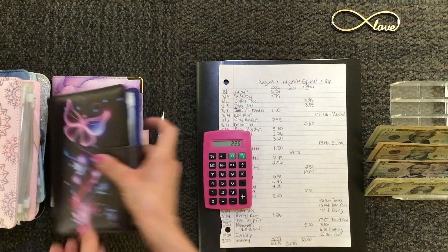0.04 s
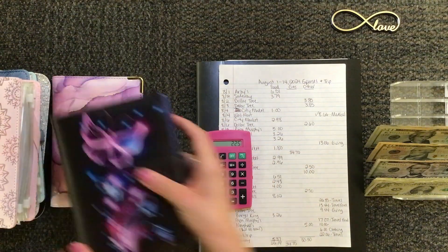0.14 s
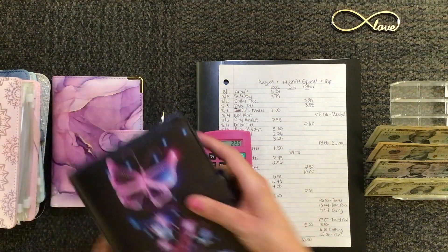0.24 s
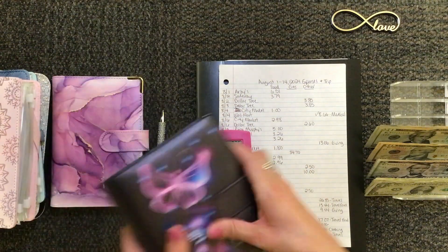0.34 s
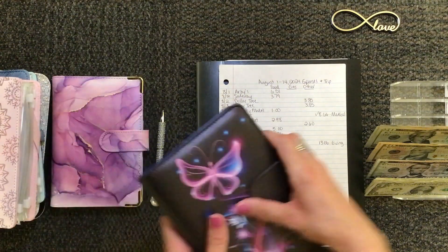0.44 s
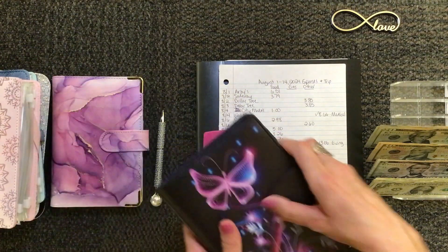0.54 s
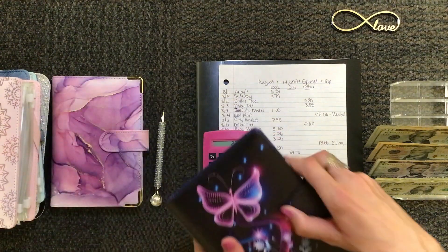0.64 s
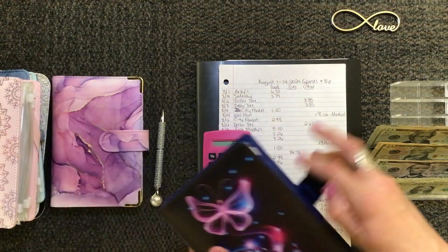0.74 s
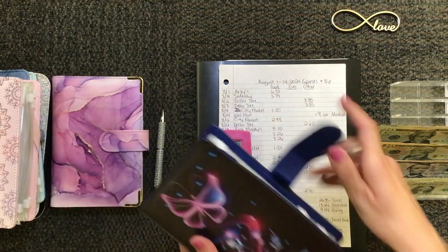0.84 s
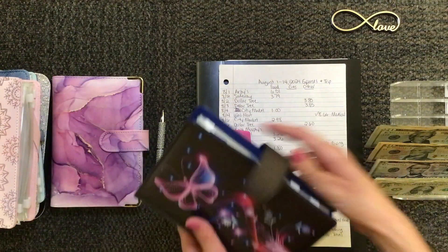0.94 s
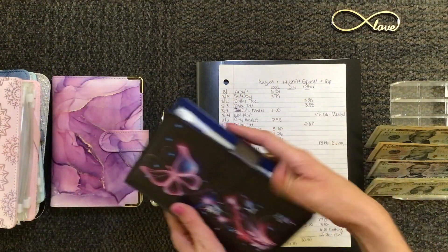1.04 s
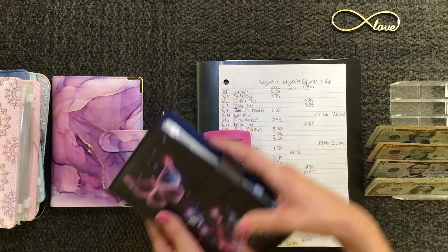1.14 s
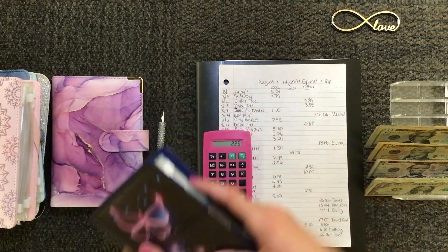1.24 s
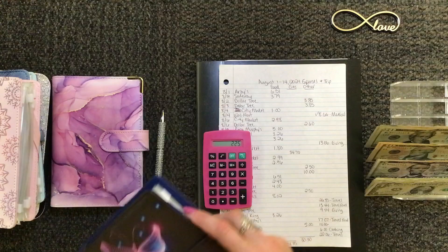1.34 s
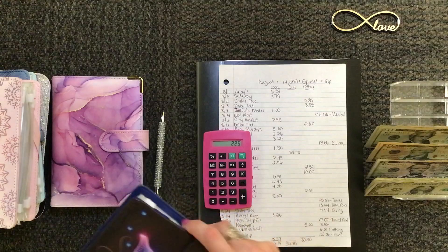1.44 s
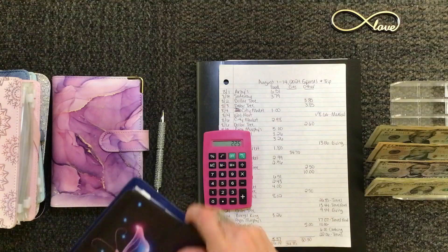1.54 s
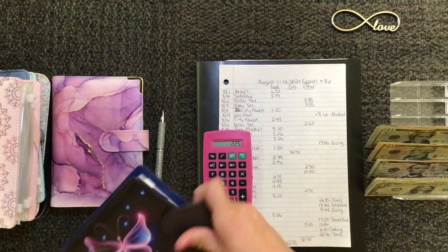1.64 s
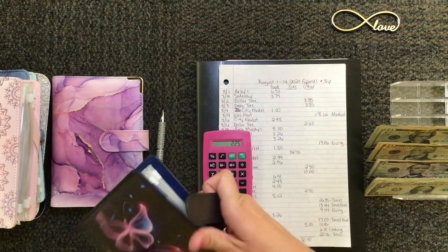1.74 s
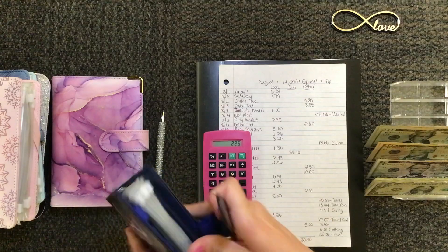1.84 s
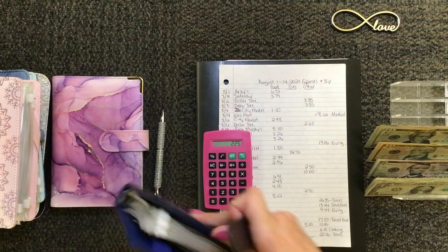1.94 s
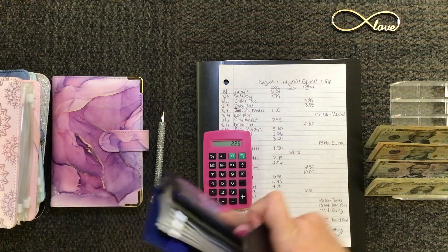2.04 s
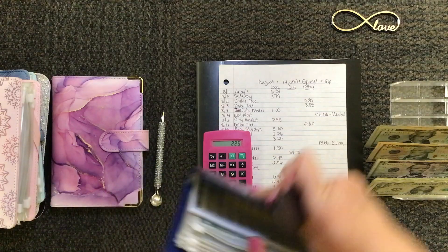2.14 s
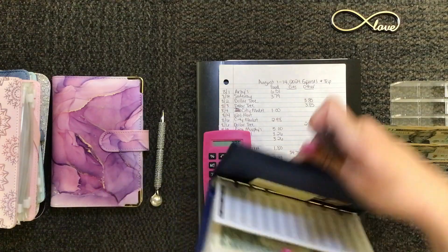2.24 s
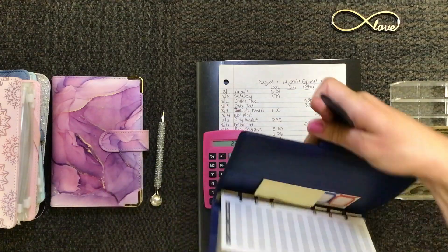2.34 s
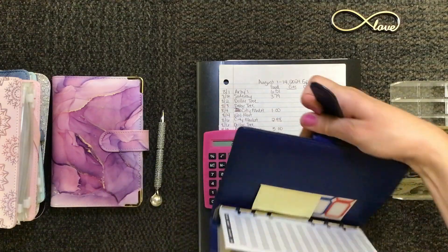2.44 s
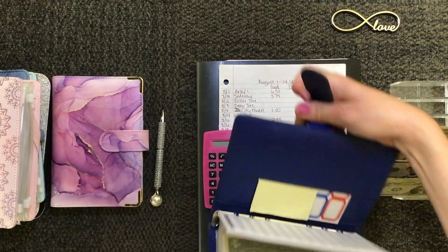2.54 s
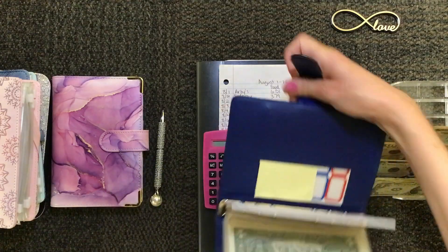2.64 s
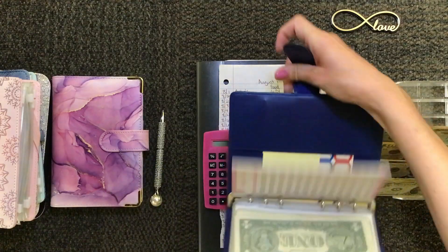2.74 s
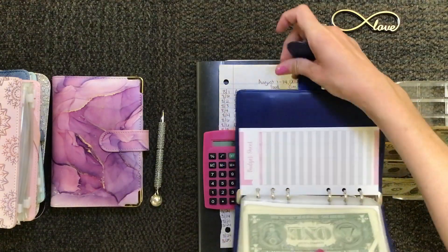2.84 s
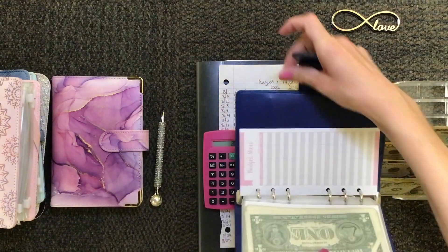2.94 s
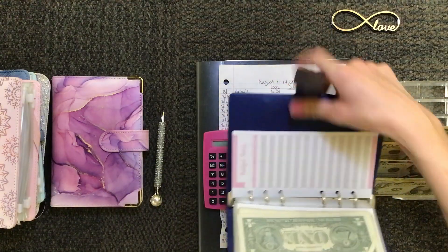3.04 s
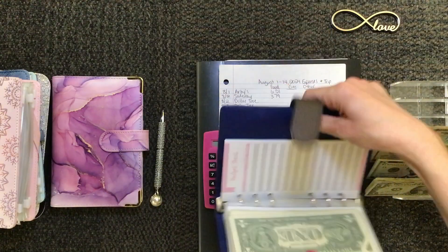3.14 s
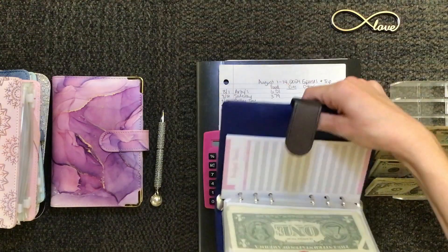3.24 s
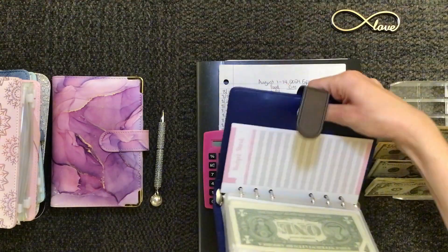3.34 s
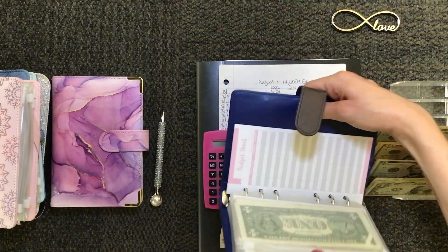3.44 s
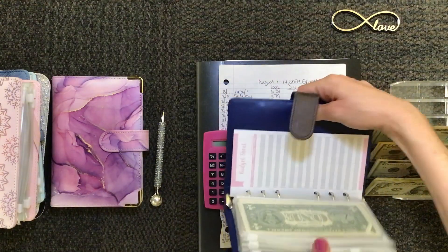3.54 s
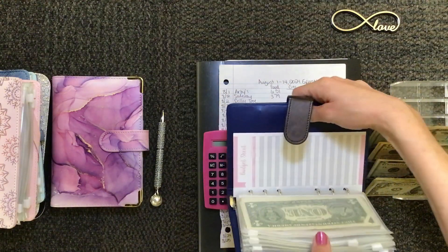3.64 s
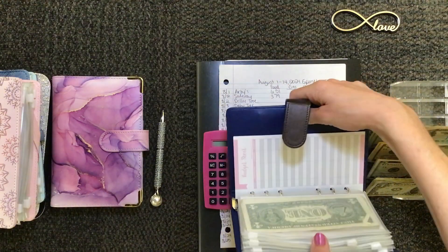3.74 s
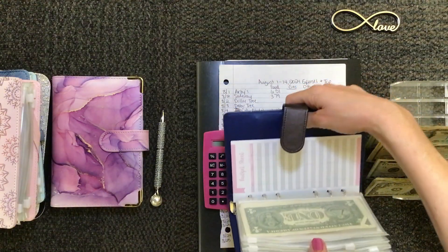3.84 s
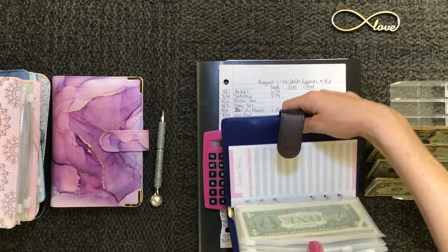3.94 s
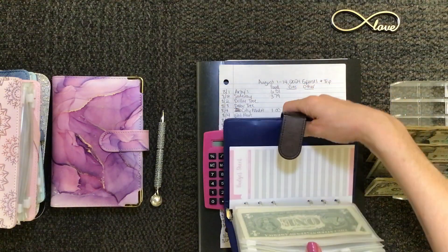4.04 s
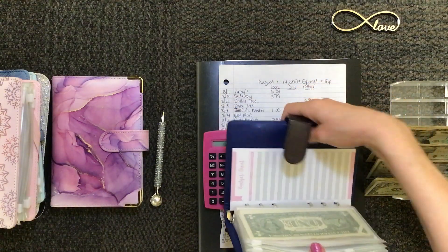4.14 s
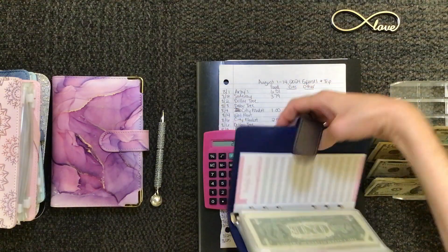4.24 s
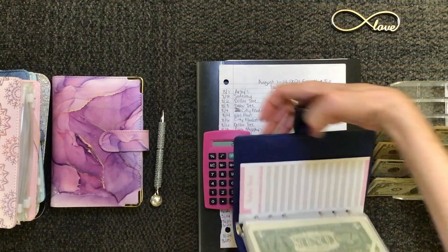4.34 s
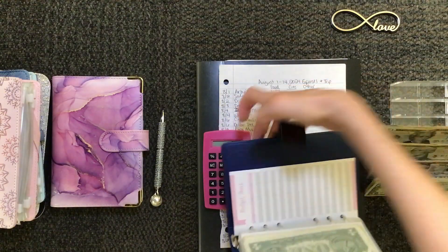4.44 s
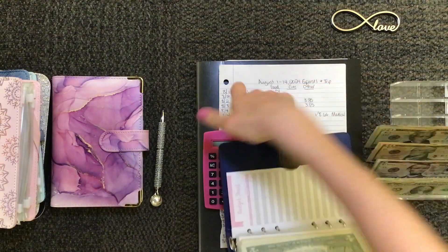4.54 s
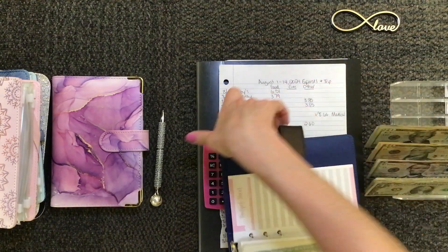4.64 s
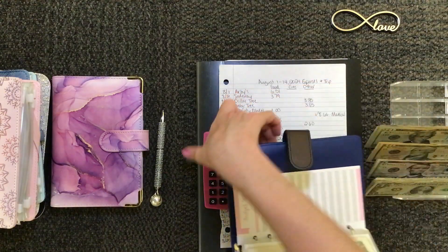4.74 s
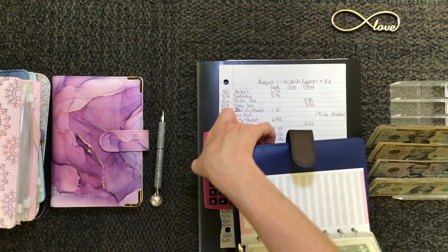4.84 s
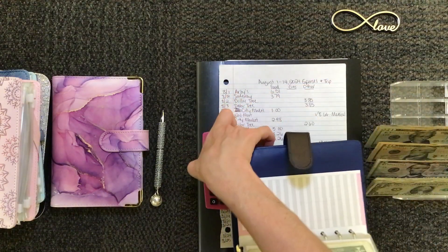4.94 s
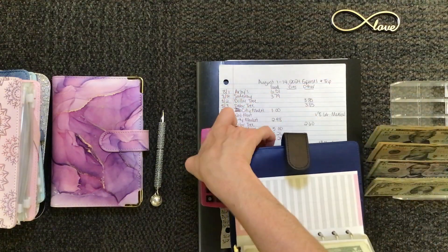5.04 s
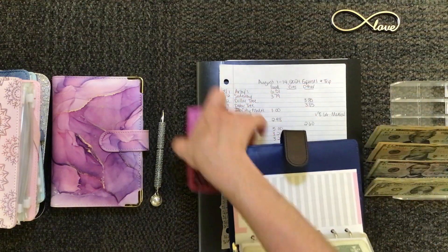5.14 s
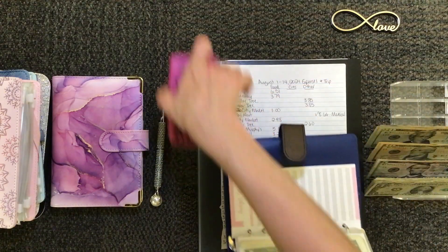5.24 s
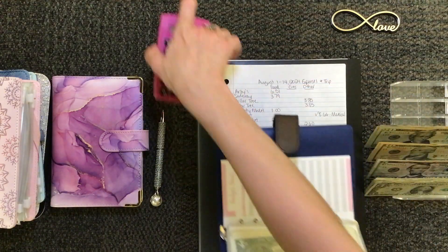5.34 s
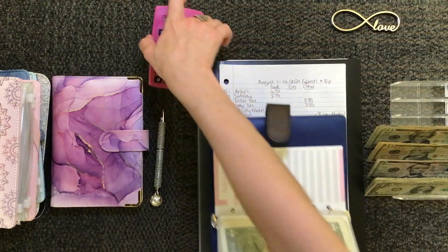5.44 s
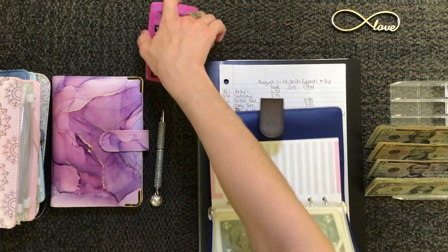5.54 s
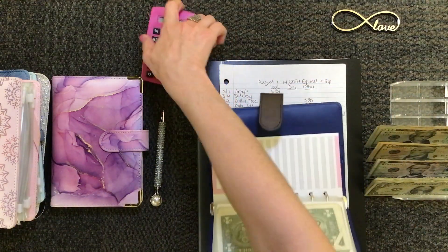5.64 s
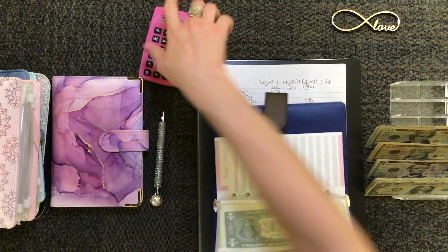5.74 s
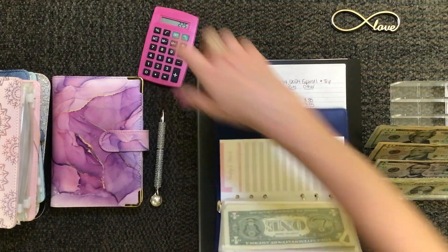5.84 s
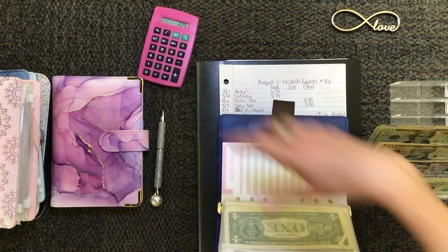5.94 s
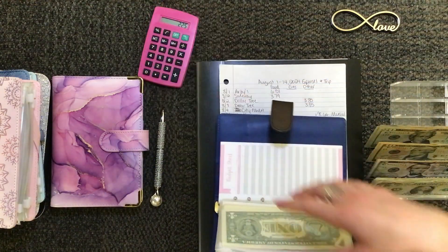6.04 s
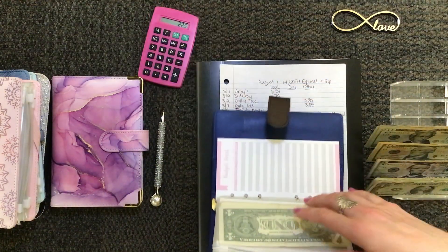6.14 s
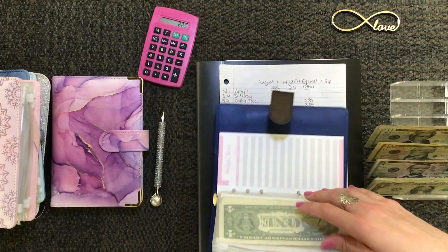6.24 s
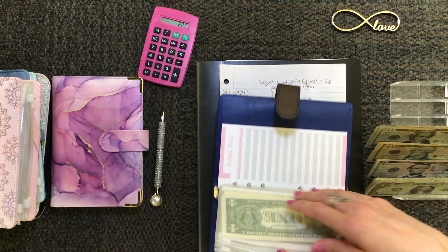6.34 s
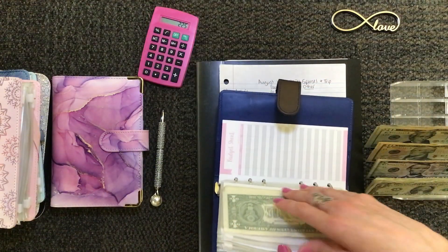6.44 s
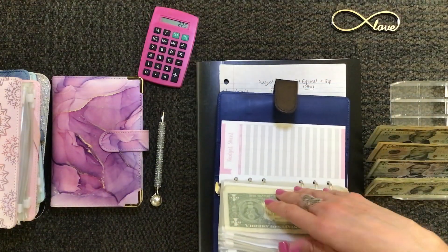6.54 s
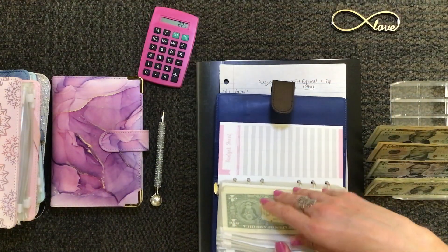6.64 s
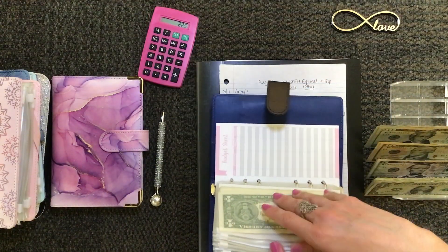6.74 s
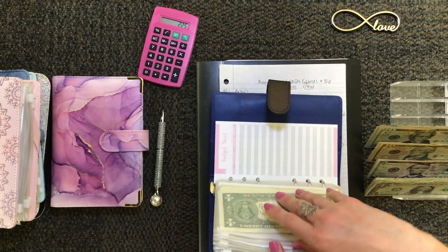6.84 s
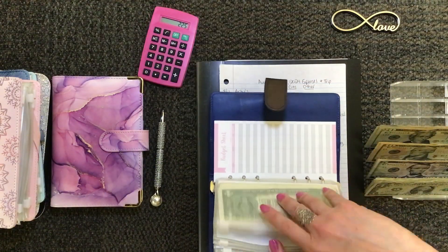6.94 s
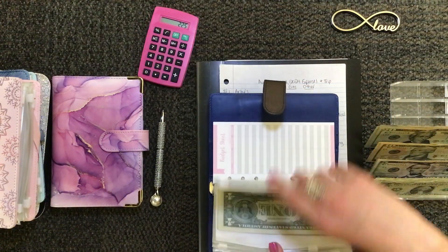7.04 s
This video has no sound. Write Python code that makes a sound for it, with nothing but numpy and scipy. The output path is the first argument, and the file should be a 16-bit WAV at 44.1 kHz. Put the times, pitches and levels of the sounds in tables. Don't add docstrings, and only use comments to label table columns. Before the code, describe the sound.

A binder is handled on a table: bent plastic snaps, skin hisses over the cover, soft bumps thud underneath. Two very loud popping strap closures stand out, about two seconds apart. Then come scattered dull page ticks, a hard hollow rattle of a calculator set down, and sparse crinkles. Close, dry microphone, short room echo, faint air noise.

```python
import sys
import numpy as np
from scipy import signal
from scipy.fft import rfft, irfft
from scipy.io import wavfile

SR = 44100
rng = np.random.default_rng(int(sys.argv[2]) if len(sys.argv) > 2 else 0)


def inscribe(sig):
    pcm = np.round(np.clip(np.atleast_2d(sig).T, -1, 1) * 32767)
    wavfile.write(sys.argv[1], SR, pcm.astype(np.int16))


def ratio_of_db(decibels):
    return 10 ** (np.asarray(decibels, float) / 20)


N = 312669


def rms_one(x):
    return x / np.sqrt(np.mean(x ** 2) + 1e-20)


def in_time(rows):
    s, *columns = np.transpose(rows)
    return [np.interp(np.arange(N) / SR, s, column) for column in columns]


def at_hz(points, hz, axis=1):
    points = np.array(points)
    return np.interp(np.log(hz), np.log(points[:, 0]), points[:, axis])


def drift(rate):
    pole = np.exp(-80 * np.pi * rate / SR)
    noise = rng.standard_normal(N // 40 + 2002)
    slow = signal.lfilter([1], [1, -2 * pole, pole * pole], noise)[2000:]
    return np.interp(np.arange(N) / 40, np.arange(len(slow)), rms_one(slow))


def colour(x, spectrum):
    hz = np.fft.rfftfreq(len(x), 1 / SR) + 1
    return rms_one(irfft(rfft(x) * ratio_of_db(at_hz(spectrum, hz)), len(x)))


def band_filter(x, edges):
    return signal.sosfilt(signal.butter(2, edges, "band", fs=SR, output="sos"), x)


def high_filter(x, hz, order=2):
    return signal.sosfilt(signal.butter(order, hz, "high", fs=SR, output="sos"), x)


def resonance(x, hz, width_hz):
    r = np.exp(-np.pi * width_hz / SR)
    return rms_one(signal.lfilter([1, 0, -1], [1, -2 * r * np.cos(2 * np.pi * hz / SR), r * r], x))


def grains(per_s, spread_db):
    sizes_db = spread_db * np.minimum(rng.exponential(1, N), 5)
    sizes = ratio_of_db(sizes_db) * rng.standard_normal(N)
    return sizes * (rng.random(N) < per_s / SR)


def add(track, s, sound):
    i = round(s * SR)
    track[i:i + len(sound)] += sound[:N - i]


def swell(s, rise_s, fall_s, db, held_s=0):
    t, power = np.arange(0, N + 32, 32) / SR, 1e-20
    for at, rise, fall, top, held in np.broadcast(s, rise_s, fall_s, db, held_s):
        distance = np.maximum((at - t) / rise, np.maximum(t - at - held, 0) / fall)
        power = power + ratio_of_db(2 * top - 40 * distance)
    return np.interp(np.arange(N) / SR, t, np.sqrt(power))


def hands():
    # t/s, rumble level/dB
    grip_curve = [(0.0, -50.5), (0.33, -61), (0.47, -55), (0.51, -45.5), (0.85, -48), (1.48, -53.5),
                  (2.67, -51), (3.04, -49), (3.49, -56.5), (3.91, -53), (5.05, -58), (5.63, -56.5),
                  (5.81, -68), (5.96, -56.5), (7.09, -56)]
    # peak t/s, 20 dB
    # rise/s, 20 dB fall/s, level/dB
    wisp_events = [(.33, .04, .04, -50), (.37, .05, .06, -49), (.45, .03, .04, -53), (.578, .02, .03, -50),
                   (.72, .08, .06, -55), (.798, .03, .03, -51), (.822, .04, .04, -46),
                   (.848, .03, .04, -52), (.897, .025, .025, -53), (1.058, .03, .04, -56),
                   (1.22, .06, .08, -62), (1.339, .006, .015, -39), (1.353, .006, .015, -41),
                   (1.81, .08, .08, -44), (1.88, .05, .05, -47), (2.26, .015, .02, -54),
                   (4.695, .005, .015, -56)]
    # f/Hz, density/dB per Hz
    slide_spectrum = [(600, -32), (1200, -13.5), (2000, 2), (3200, 0.5), (5300, 2), (6700, -1.5),
                      (9000, 1.5), (12000, -1), (16000, -0.5)]
    # f/Hz, density/dB per Hz
    sheen_spectrum = [(5000, -30), (8000, -8), (10000, -2), (13500, 2), (15500, -3), (17000, -8)]
    # f/Hz, density/dB per Hz
    rumble_spectrum = [(90, -56), (200, 3), (320, 1), (600, -3), (1000, -4.5), (2000, -32.5)]

    grip_db = in_time(grip_curve)[0]
    creep_db = .3 * (grip_db - grip_db.mean())
    clump, slips = drift(35), grains(9000, spread_db=1.5)
    slide = ratio_of_db(1.5 + .9 * clump + 0.43 * drift(65)) * colour(slips, slide_spectrum)
    sheen = ratio_of_db(1.5 * clump) * swell(*np.transpose(wisp_events)) * colour(slips, sheen_spectrum)
    rustle = ratio_of_db(-3.0 + 0.84 * clump + 0.5 * drift(38)) * sleeve_rustle()
    rumble = ratio_of_db(grip_db - 2.5 + 1.8 * drift(14)) * colour(rng.standard_normal(N), rumble_spectrum)
    hiss_gain = effort(axis=-2, creep_db=-69 + creep_db)
    rustle_gain = effort(axis=-1, creep_db=-62.5 + creep_db)
    return hiss_gain * slide + rustle_gain * rustle + rumble + sheen


def effort(axis, creep_db):
    # peak t/s, 20 dB rise/s, 20 dB fall/s, hiss level/dB, rustle level/dB
    sweeps = [(.018, .03, .1, -51, -45), (.7, .2, .1, -58, -46), (.83, .06, .07, -52, -56),
              (.895, .03, .04, -60, -56), (1.07, .1, .2, -60, -43), (1.31, .15, .06, -44, -44),
              (1.558, .045, .05, -41, -39.5), (1.72, .12, .1, -46, -45), (1.81, .16, .2, -36, -41),
              (1.96, .1, .12, -51, -48), (2.01, .1, .06, -53, -46), (2.574, .15, .12, -50, -52),
              (2.696, .1, .07, -49, -52), (3.15, .1, .3, -57, -56), (3.646, .1, .08, -59, -59),
              (4.05, .1, .13, -63, -46), (4.25, .15, .12, -52, -47), (4.39, .1, .06, -53, -56),
              (5.03, .1, .15, -60, -66), (5.42, .3, .3, -64, -66), (6.21, .11, .015, -50, -49),
              (6.33, .06, .09, -44, -54), (7.09, .4, .1, -60, -53)]
    # t/s, 20 dB fall/s, hiss level/dB, rustle level/dB
    flicks = [(.162, .03, -54, -49), (.578, .04, -39, -38), (1.345, .11, -41, -42), (2.292, .05, -52, -42),
              (2.354, .07, -50.5, -52), (2.43, .07, -62, -50), (3.222, .02, -45, -56),
              (3.476, .07, -59.5, -62), (4.692, .03, -50, -60), (4.874, .15, -59, -62),
              (5.79, .25, -54, -47), (5.928, .03, -55, -52), (6.176, .12, -56, -38), (6.48, .03, -52, -60),
              (6.606, .05, -49, -41), (6.696, .035, -45, -50), (6.67, .06, -60, -50),
              (6.786, .05, -62, -58)]
    # start t/s, held/s, hiss level/dB, rustle level/dB
    drags = [(.17, .11, -75, -55), (.293, .045, -41, -38), (.36, .03, -43, -39), (.43, .14, -56, -43),
             (.62, .36, -66, -49), (1.005, .017, -48, -39), (1.16, .55, -68, -48), (2.12, .18, -52, -45),
             (2.503, .2, -59, -48), (2.7, .14, -64, -51), (3.07, .17, -64, -54), (3.6, .45, -80, -60),
             (4.162, .25, -54, -54), (4.162, .06, -62, -52), (6.24, .11, -50, -50), (6.38, .1, -61, -64)]

    sweeps, flicks, drags = np.transpose(sweeps), np.transpose(flicks), np.transpose(drags)
    sweeping = swell(*sweeps[:3], sweeps[axis])
    flicking = swell(flicks[0], .009, flicks[1], flicks[axis])
    dragging = swell(drags[0], .012, .06, drags[axis], held_s=drags[1])
    return np.sqrt(np.sum(np.square([sweeping, flicking, dragging, ratio_of_db(creep_db)]), axis=0))


def sleeve_rustle():
    # f/Hz, width/Hz
    sleeve_modes = [(1500, 1100), (2200, 1200), (3200, 1500), (4800, 2700)]
    # f/Hz, density/dB per Hz
    rustle_spectrum = [(300, -26), (800, -8), (1400, 1.5), (2200, 3), (3200, -3), (5000, -6.5),
                       (6500, -41.5), (9000, -89)]

    slips = grains(5000, spread_db=2.0)
    bent = sum(ratio_of_db(4.0 * drift(6)) * resonance(slips, hz, width_hz) for hz, width_hz in sleeve_modes)
    return rms_one(.9 * rms_one(bent) + colour(slips, rustle_spectrum))


def scrapes():
    # start t/s, length/s, from f/Hz, to f/Hz, level/dB
    scrape_events = [(.44, .05, 2000, 2100, -48), (.48, .17, 2000, 1600, -48), (.66, .08, 4000, 8000, -56),
                     (4.165, .13, 3200, 6000, -56), (4.165, .05, 1600, 2000, -52),
                     (4.3, .13, 2200, 2700, -57), (4.33, .1, 900, 1000, -59), (4.88, .04, 1100, 1200, -55),
                     (4.592, .035, 1220, 1180, -55), (5.385, .04, 1350, 1300, -54),
                     (6.66, .05, 1200, 1900, -51), (1.72, .1, 2300, 2600, -44),
                     (1.76, .15, 5200, 4900, -46), (1.34, .05, 4900, 4800, -46),
                     (1.53, .06, 2500, 2300, -46), (2.795, .05, 2100, 2000, -49),
                     (1.08, .16, 300, 270, -43), (1.03, .15, 115, 110, -49), (1.21, .12, 2500, 2600, -48),
                     (.54, .18, 850, 950, -50), (2.93, .1, 500, 450, -46), (3.17, .08, 520, 500, -52),
                     (.3, .1, 115, 110, -52)]

    out = np.zeros(N)
    noises = rng.standard_normal((len(scrape_events), 2, 8192))
    for (s, length, from_hz, to_hz, db), noise in zip(scrape_events, noises):
        part = np.linspace(0, 1, min(int(length * SR), 8192))
        hz = from_hz * (to_hz / from_hz) ** part
        low_pass = signal.butter(2, .16 * hz.mean(), fs=SR, output="sos")
        rough = signal.sosfilt(low_pass, noise)[:, -len(part):]
        glide = np.exp(2j * np.pi * np.cumsum(hz) / SR)
        band = np.real((rough[0] + 1j * rough[1]) * glide)
        add(out, s, ratio_of_db(db) * np.sqrt(np.sin(np.pi * part) + 1e-9) * rms_one(band))
    return out


def ticks(events, ring_ms, overtones, grit_share, trim_db, ratios=(.72, 1.5, 2.2)):
    out, t = np.zeros(N), np.arange(2048) / SR
    age = t / ring_ms * 1000
    for (s, db, hz, crack_db), noise in zip(events, rng.standard_normal((len(events), 2048))):
        body = np.sin(2 * np.pi * hz * t) * ratio_of_db(-60 * age)
        for k, ratio in enumerate(ratios):
            overtone_hz = hz * ratio * (1 + .08 * noise[k])
            body = body + overtones * np.sin(2 * np.pi * overtone_hz * t) * ratio_of_db(-90 * age)
        edges = np.clip([hz * .6, hz * 1.1 * ratios[-1]], 100, 15000)
        grit = band_filter(noise, edges) * ratio_of_db(-25 * age)
        click = (1 - np.exp(-t / 2e-4)) * (body + grit_share * grit)
        crack = ratio_of_db(crack_db + 8) * high_filter(noise, 5000) * np.exp(-t / 0.0009)
        add(out, s, ratio_of_db(db + trim_db) * (click / np.abs(click).max() + crack))
    return out


def creases():
    # t/s, peak level/dB, ring f/Hz
    crease_events = [(0.16, -42, 1860), (0.3197, -22, 1880), (0.4743, -32, 1840), (0.5766, -29, 2110),
                     (1.1524, -34, 2000), (1.3379, -29, 2900), (1.35, -33, 2900), (1.5524, -29, 2540),
                     (2.1161, -35, 2130), (2.2248, -32, 2280), (2.2907, -30, 1900), (2.5034, -32, 1910),
                     (2.5242, -28, 1900), (2.84, -38, 1500), (3.0884, -38, 1830), (3.1174, -35, 2400),
                     (3.1572, -29, 1450), (3.1892, -28, 2130), (3.2084, -33, 1880), (3.2221, -35, 2150),
                     (3.4585, -39, 2020), (3.5823, -43, 1520), (4.2378, -31, 2060), (4.6934, -37, 1850),
                     (6.2128, -31, 2130), (6.2484, -29, 1980), (6.3215, -34, 1500), (6.9237, -45, 2060),
                     (6.982, -42, 1840)]
    crack_db = -15.0
    return ticks([(*row, crack_db) for row in crease_events],
                 ring_ms=9.0, overtones=.6, grit_share=.7, trim_db=-.5)


def pages():
    # t/s, peak level/dB, ring f/Hz
    page_events = [(2.4309, -38, 1870), (2.9921, -34, 2300), (3.041, -36, 2220), (3.0654, -32, 1900),
                   (3.1258, -28, 1730), (3.2675, -36, 2070), (3.6287, -35, 1920), (3.6726, -29, 2240),
                   (3.7249, -38, 1920), (3.7858, -36, 2030), (3.8132, -31, 1900), (3.8801, -33, 1420),
                   (3.9744, -38, 2240), (4.0374, -34, 1400), (4.0442, -28, 1950), (4.1574, -31, 1520),
                   (4.814, -40, 1450), (4.8754, -33, 1530), (4.8808, -30, 1250), (5.9279, -36, 1370),
                   (6.785, -38, 1780), (7.0744, -28, 2010), (7.0828, -22, 1770)]
    # t/s,
    # peak level/dB, ring f/Hz
    voice_events = [(3.6287, -37, 2930), (3.6726, -34, 2920), (3.7858, -40, 2840), (3.8132, -35, 2940),
                    (3.8801, -37, 2920), (3.9744, -38, 2900), (4.0442, -31, 2900), (4.0452, -32, 1010),
                    (4.876, -38, 5230), (6.4802, -38, 4400), (6.6044, -30, 2680), (6.606, -35, 4200),
                    (6.612, -31, 1800), (6.623, -33, 1500), (6.6955, -34, 4190), (.858, -38, 2000),
                    (5.763, -24, 5600), (5.7625, -8, 1700), (2.13, -38, 1500), (2.168, -39, 2500),
                    (2.19, -37, 2600), (2.291, -30, 3100), (2.303, -37, 2200), (2.5035, -33, 2900),
                    (2.5242, -30, 2900), (2.533, -38, 1500), (2.752, -39, 1700), (3.595, -42, 1500)]
    crack_db = -29.0
    return ticks([(*row, crack_db) for row in [*page_events, *voice_events]],
                 ring_ms=11.0, overtones=.45, grit_share=.6, trim_db=-1.5, ratios=(.72, 1.2, 1.45))


def taps():
    # t/s, peak level/dB, ring f/Hz, crack level over the ring/dB
    tap_events = [(0.2925, -20, 1400, -20), (0.3014, -22, 1100, -15), (2.7596, -33, 1760, -25),
                  (2.7921, -30, 2230, -28), (3.3922, -37, 1840, -20), (4.5111, -34, 2010, -28),
                  (4.5875, -29, 1200, -30), (4.6853, -30, 1920, -15), (5.2959, -28, 1990, -33),
                  (5.3797, -25, 1310, -33), (5.8092, -27, 1530, -23), (6.1764, -24, 1380, -21),
                  (6.2412, -27, 1990, -16), (6.4802, -33, 1590, -21), (6.6044, -30, 1750, -18),
                  (6.6942, -31, 1740, -12)]
    return ticks(tap_events, ring_ms=19.0, overtones=.3, grit_share=.5, trim_db=-1.5, ratios=(.75, 1.4, 1.8))


def snaps():
    # t/s, peak level/dB, ring f/Hz, swell/ms
    air_pops = [
        (1.0236, -10, 2120, 0.26),
        (1.0227, -11, 4300, 0.51),
        (1.0227, -11, 1200, .6),
        (1.0243, -15, 3400, .5),
        (1.0233, 1, 1420, 0.737),
        (1.0238, 2, 1730, 0.52),
        (2.8517, 3, 1500, 0.75),
        (2.8514, -18, 5000, 0.45),
        (2.8516, -12, 2650, .5),
    ]
    # t/s, dull crack level/dB, bright crack level/dB, flap level/dB, table blow level/dB
    closings = [
        (1.0227, -15, -38, -26.5, -24),
        (2.8514, -24, -16, -41, -25),
    ]
    # f/Hz, density/dB per Hz
    flap_spectrum = [(800, -21.5), (2000, 8), (4300, -4), (6000, -15), (9000, -12), (16000, -18.5)]

    out, blows, t = np.zeros(N), np.zeros(N), np.arange(8192) / SR
    for s, db, hz, swell_ms in air_pops:
        x = t / swell_ms * 1000
        puff = x ** 3 * np.exp(3 - 3 * x)
        add(out, s, ratio_of_db(db) * puff * np.cos(2 * np.pi * hz * (t - swell_ms / 1000)))
    for (s, dull_db, bright_db, flap_db, table_db), noise in zip(closings, rng.standard_normal((2, 8192))):
        flutter = colour(noise, flap_spectrum)
        dull_crack = ratio_of_db(dull_db) * flutter * np.exp(-t / 0.0012)
        bright_crack = ratio_of_db(bright_db) * high_filter(noise, 4300, order=4) * np.exp(-t / 0.0006)
        add(out, s, dull_crack + bright_crack)
        add(out, s, ratio_of_db(flap_db - 60 * t / 0.31) * flutter)
        add(blows, s + 0.0011, np.array([ratio_of_db(table_db)]))
    return out + high_filter(table(blows), 150)


def table(blows):
    # f/Hz, level/dB, t60/s
    top_modes = [(217, -9, 0.04), (293, -5, 0.14), (343, 1, 0.086), (515, 3.5, 0.027), (725, -8, 0.1),
                 (990, -36, 0.073)]

    soft = signal.lfilter([.3], [1, -.7], blows + 1e-18)
    out = np.zeros(N)
    for hz, db, t60 in top_modes:
        r, w = ratio_of_db(-60 / (t60 * SR)), 2 * np.pi * hz / SR
        out += ratio_of_db(db) * signal.lfilter([0, np.sin(w)], [1, -2 * r * np.cos(w), r * r], soft)
    return out


def calculator():
    # t/s, level/dB, 20 dB fall/s, clack level/dB
    bounces = [(5.64, -33, .015, -52), (5.654, -27, .025, -38), (5.663, -24, .03, -41),
               (5.676, -17, .03, -28), (5.685, -16.5, .03, -27), (5.698, -23, .02, -46),
               (5.71, -31, .15, -47), (5.724, -29, .015, -55), (5.737, -28, .03, -50),
               (5.758, -26, .05, -34), (5.81, -30, .04, -45)]
    # f/Hz, width/Hz, level/dB
    shell_modes = [(300, 120, -10), (590, 90, -9), (727, 80, -8), (950, 200, -6), (1200, 220, 2.5),
                   (1560, 300, 2), (2000, 300, -.5), (2600, 700, -5), (3400, 1200, -8), (5300, 1500, -7),
                   (7500, 2500, -16), (9500, 2000, -18), (14500, 4000, -23)]
    # f/Hz, density/dB per Hz
    clack_spectrum = [(4000, -25), (6000, -3), (9000, 0), (11500, -4), (14500, 0), (16500, -3)]
    # t/s, level/dB
    lift_curve = [
        (5.3, -52),
        (5.32, -50),
        (5.332, -44),
        (5.35, -46),
        (5.365, -60),
    ]
    rise_s, clack_fall_s = .002, .022
    creak_hz, creak_width_hz = 2080, 330

    t = np.arange(N) / SR
    clatter = grains(12000, spread_db=1.0) * ratio_of_db(1.2 * drift(70))
    shell = 0
    for k, (hz, width_hz, db) in enumerate(shell_modes):
        shell = shell + (-1) ** k * ratio_of_db(db) * resonance(clatter, hz, width_hz)
    s, db, fall_s, clack_db = np.transpose(bounces)
    rattle = swell(s, rise_s, fall_s, db) * rms_one(shell)
    clack = swell(s, rise_s, clack_fall_s, clack_db) * colour(clatter, clack_spectrum)
    creak = resonance(resonance(clatter, creak_hz, creak_width_hz), creak_hz, creak_width_hz)
    lifting = (t > lift_curve[0][0]) & (t < lift_curve[-1][0])
    return rattle + clack + ratio_of_db(in_time(lift_curve)[0]) * lifting * creak


def knocks():
    # t/s, peak level/dB, ring f/Hz, t60/s
    bumps = [(0.293, -33, 515, 0.089), (.3, -31, 217, 0.16), (0.327, -34.5, 217, 0.13),
             (0.478, -27.5, 290, 0.077), (0.496, -36, 226, 0.1), (2.896, -33, 640, 0.2),
             (.48, -36, 108, 0.14), (2.5, -32.5, 591, 0.058), (3.191, -37.5, 320, 0.058),
             (3.703, -35, 760, 0.026), (1.338, -23, 4930, 0.024), (6.25, -36, 520, .05),
             (6.37, -42, 330, 0.042), (6.18, -43, 350, .1), (6.62, -46, 700, .1), (6.79, -41, 320, .05),
             (4.046, -38, 700, .05), (1.011, -38, 450, .04), (1.041, -26, 600, .05), (5.69, -33, 330, .12),
             (.49, -34, 300, .12), (1.079, -26, 1050, .04), (2.3, -42, 270, .1), (2.51, -38, 850, .05)]

    out, t = np.zeros(N), np.arange(16384) / SR
    for (s, db, hz, t60), noise in zip(bumps, rng.standard_normal((len(bumps), 16384))):
        wobble = rms_one(band_filter(noise, [hz * .7, hz * 1.5]))
        tone = .7 * np.sin(2 * np.pi * hz * t) + .45 * wobble
        add(out, s, ratio_of_db(db - 60 * t / t60) * tone * (1 - np.exp(-t / 0.0013)))
    return out


def room(x):
    # f/Hz, t60/s, level/dB
    decay = [(100, 0.2, 9), (180, .3, -2), (280, 0.45, -7), (746, 0.3, 2.5), (1730, .22, -11),
             (4440, 0.17, -3), (12140, 0.2, -20)]
    echo_db = -9.5

    t, tail = np.arange(SR // 2) / SR, 0
    for hz in 90 * 2 ** np.arange(0, 7.6, .5):
        band = band_filter(rng.standard_normal(len(t)), hz * 2 ** np.array([-.25, .25]))
        tail = tail + band * ratio_of_db(at_hz(decay, hz, axis=2) - 60 * t / at_hz(decay, hz))
    tail = tail * np.clip((t - .002) / 0.0067, 0, 1)
    return signal.fftconvolve(x, ratio_of_db(echo_db - 24.5) * tail)[:N]


def room_air():
    # f/Hz, density/dB per Hz
    air_spectrum = [(30, -28), (60, 3), (110, 1.5), (300, -7), (960, -19), (2000, -17.5), (2600, -25),
                    (4800, -23.5), (6900, -27), (9500, -26.5), (13000, -33.5), (16000, -32.5)]
    return ratio_of_db(-54.5 + 1.5) * colour(rng.standard_normal(N), air_spectrum)


def scene():
    objects = creases() + pages() + taps() + snaps() + knocks() + calculator()
    return (objects + room(objects) + hands() + scrapes() + room_air())[None]


def top_cut(x):
    return signal.sosfilt(signal.butter(12, 17040, fs=SR, output="sos"), x)


def record(dry):
    mic = high_filter(dry, 52, order=4)
    cut = signal.sosfilt(signal.cheby2(12, 60, 16400, fs=SR, output="sos"), mic)
    flat = cut / (1 + np.abs(cut) ** 12) ** (1 / 12)
    return top_cut(flat)


dry = scene()
out = record(dry)
inscribe(out)
```